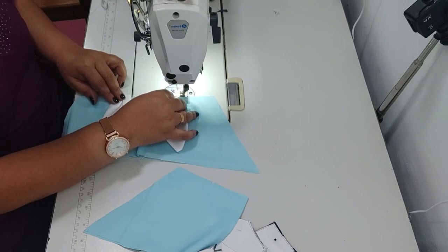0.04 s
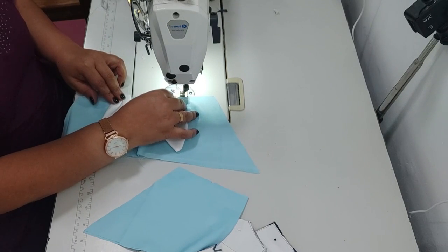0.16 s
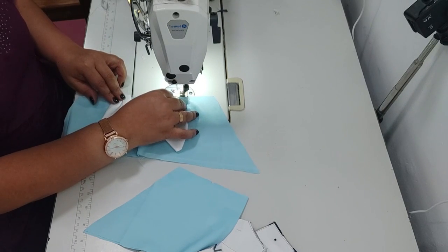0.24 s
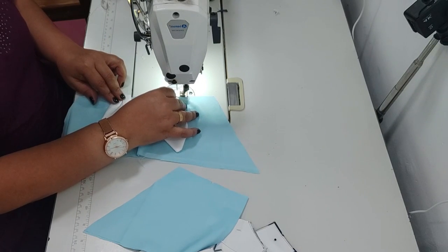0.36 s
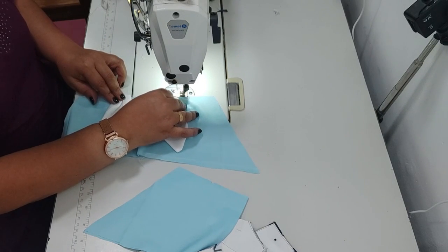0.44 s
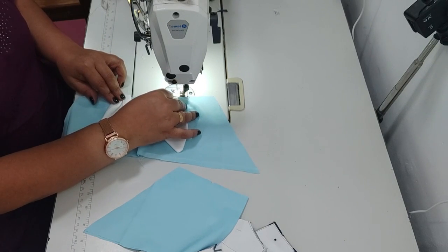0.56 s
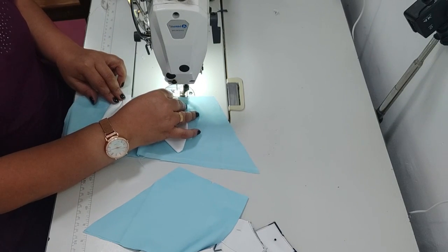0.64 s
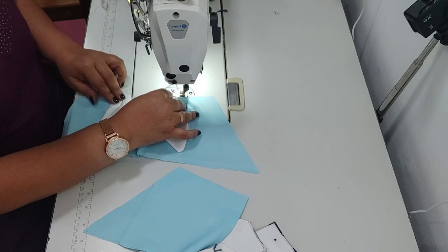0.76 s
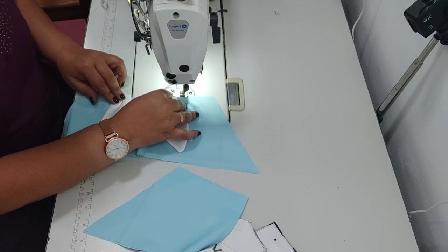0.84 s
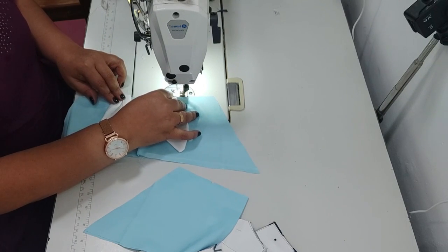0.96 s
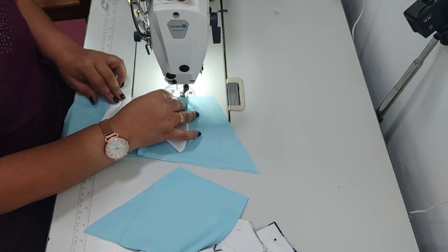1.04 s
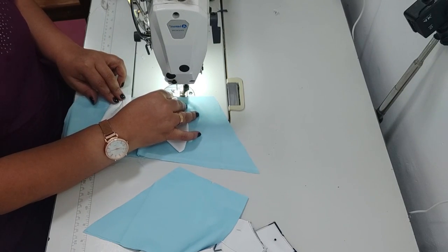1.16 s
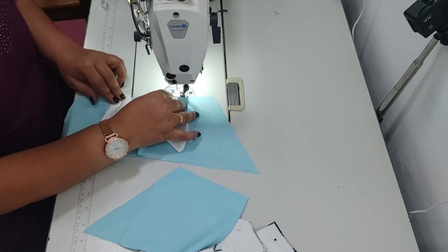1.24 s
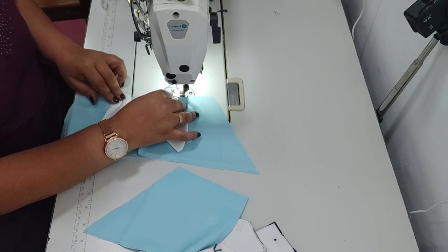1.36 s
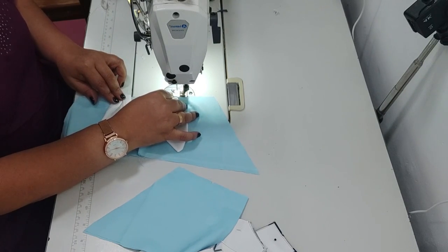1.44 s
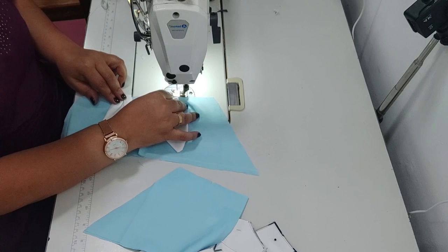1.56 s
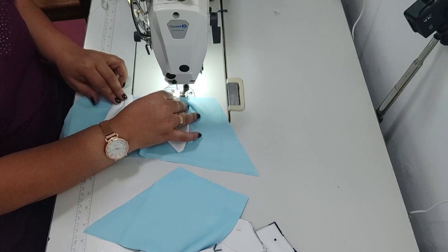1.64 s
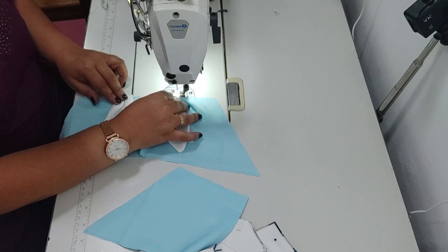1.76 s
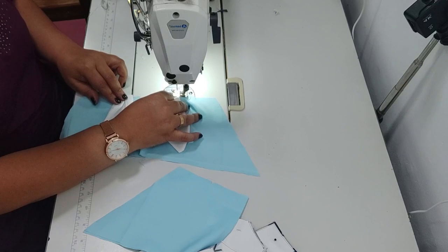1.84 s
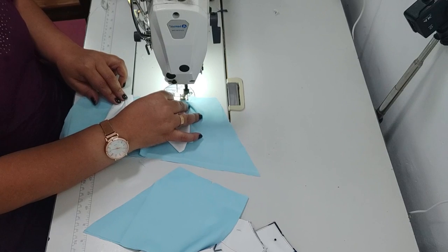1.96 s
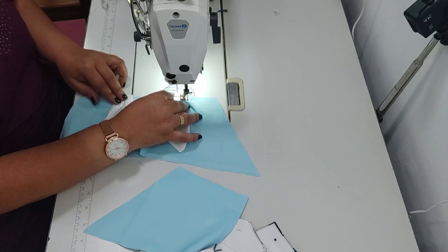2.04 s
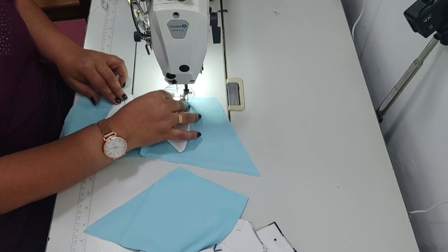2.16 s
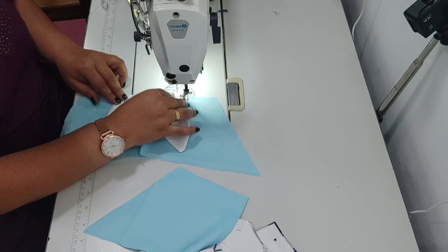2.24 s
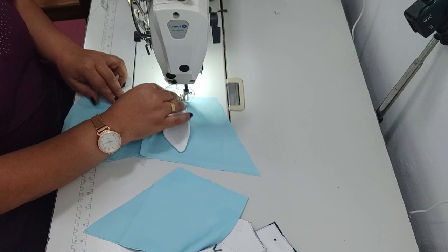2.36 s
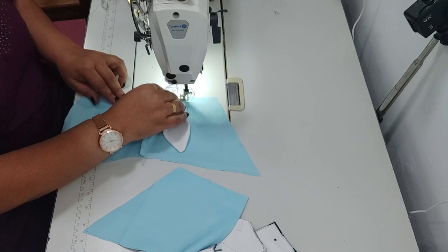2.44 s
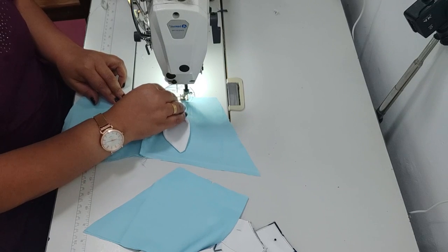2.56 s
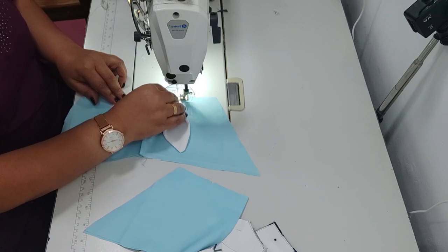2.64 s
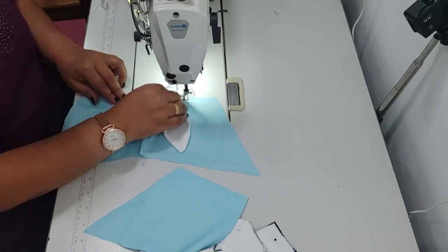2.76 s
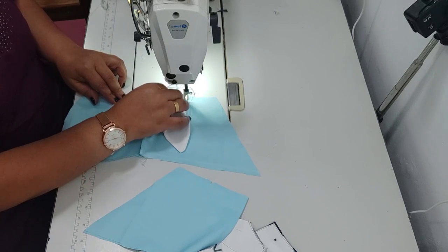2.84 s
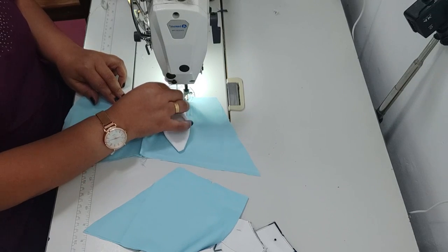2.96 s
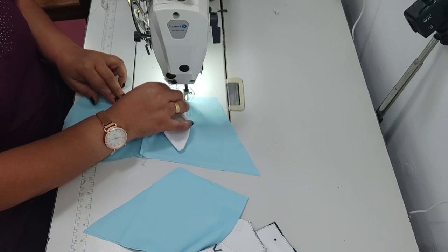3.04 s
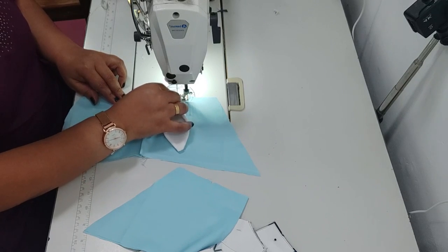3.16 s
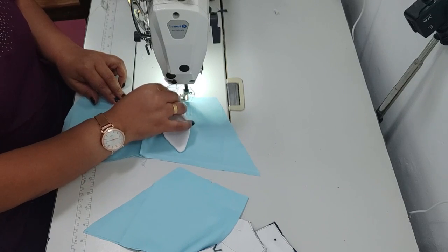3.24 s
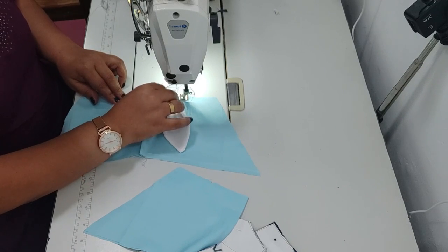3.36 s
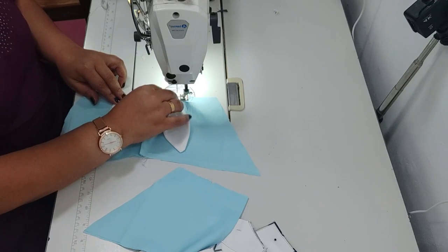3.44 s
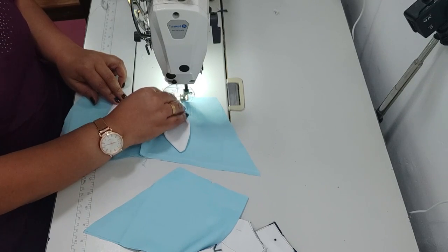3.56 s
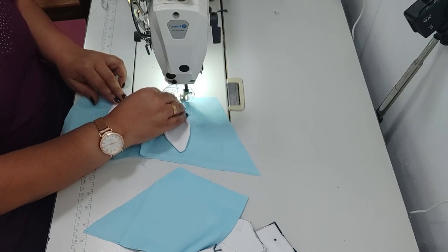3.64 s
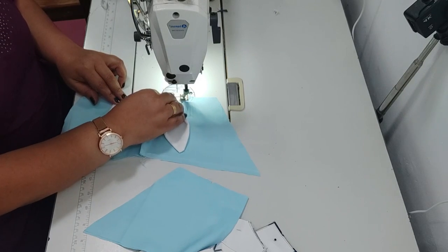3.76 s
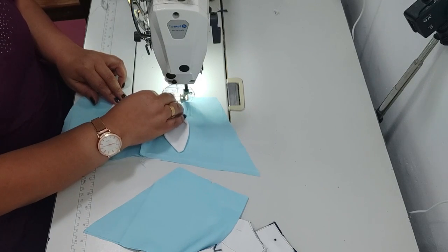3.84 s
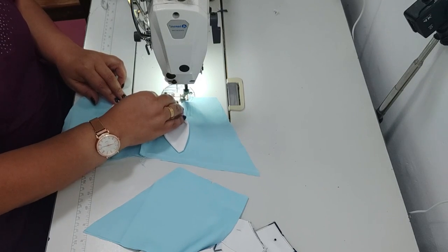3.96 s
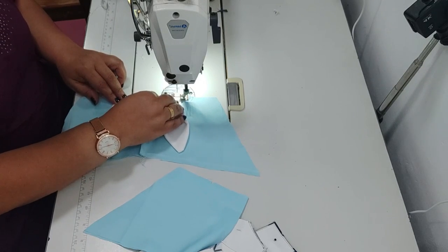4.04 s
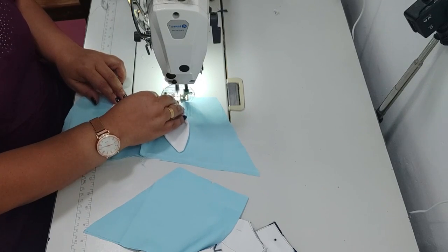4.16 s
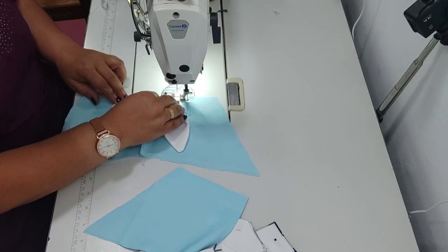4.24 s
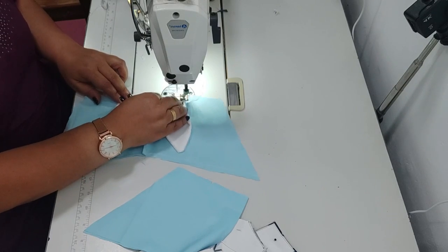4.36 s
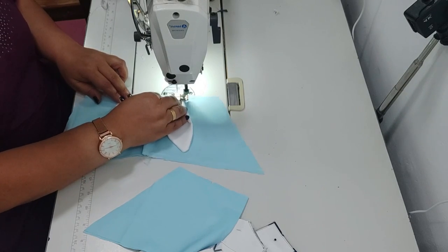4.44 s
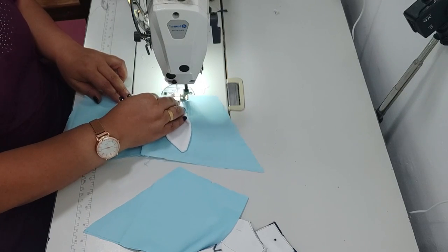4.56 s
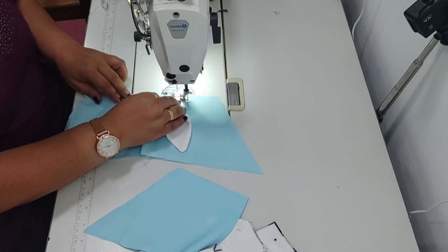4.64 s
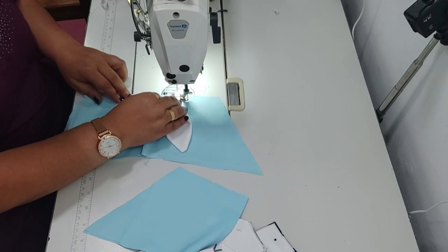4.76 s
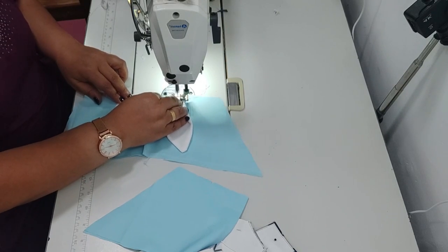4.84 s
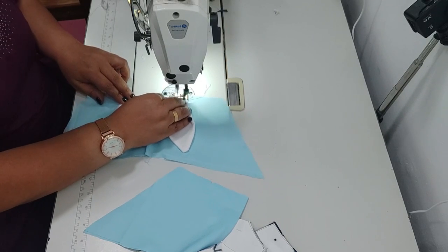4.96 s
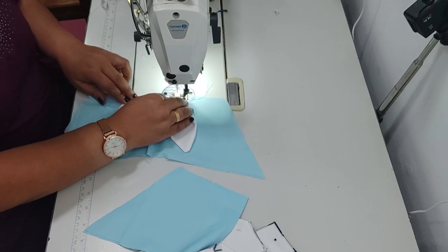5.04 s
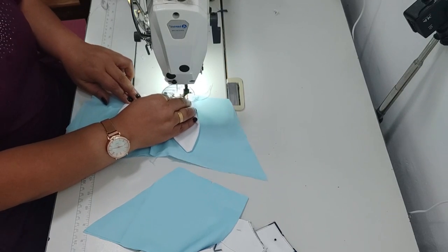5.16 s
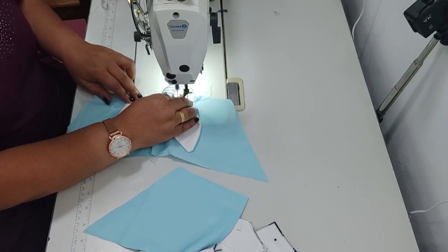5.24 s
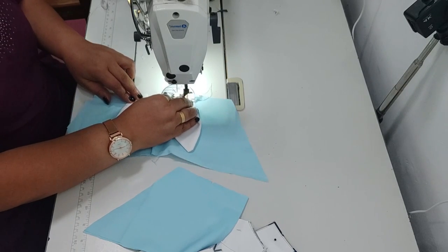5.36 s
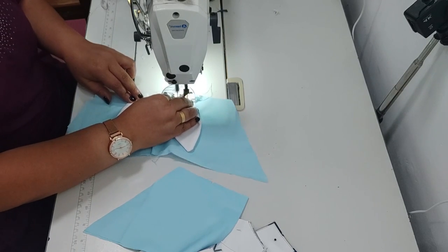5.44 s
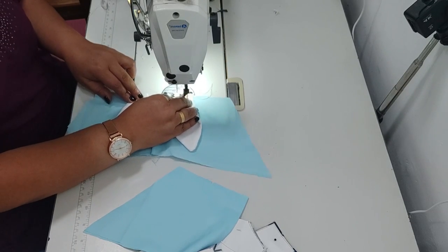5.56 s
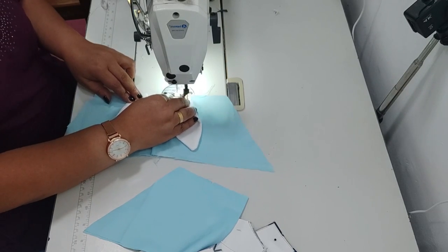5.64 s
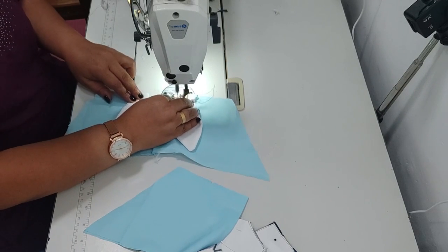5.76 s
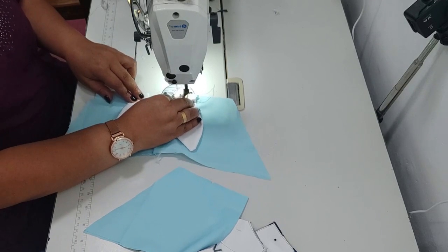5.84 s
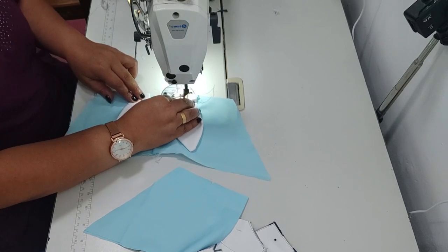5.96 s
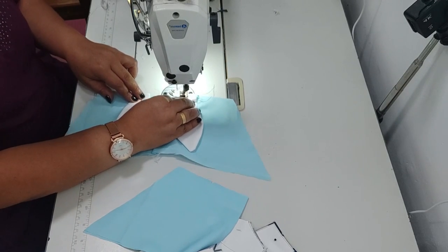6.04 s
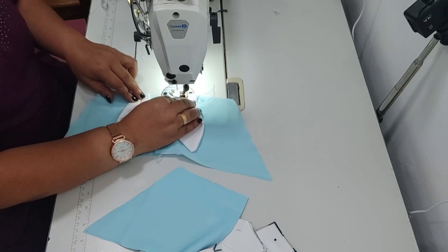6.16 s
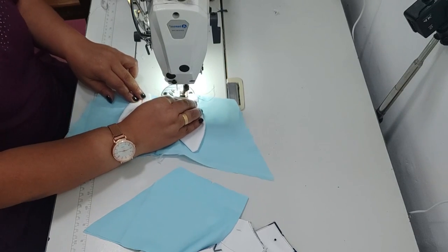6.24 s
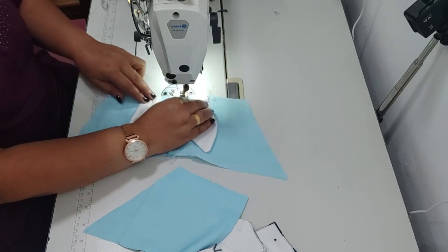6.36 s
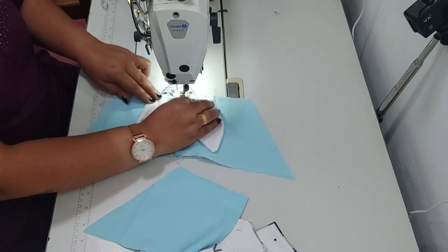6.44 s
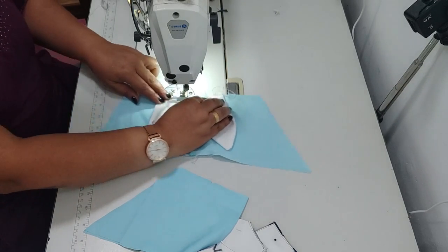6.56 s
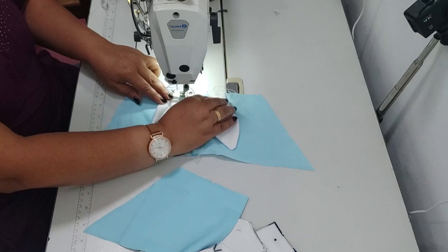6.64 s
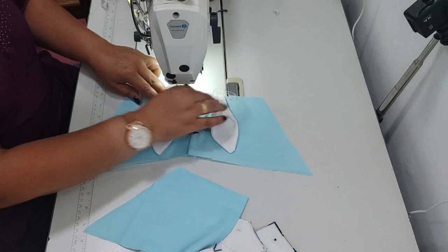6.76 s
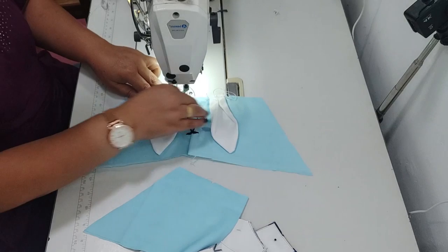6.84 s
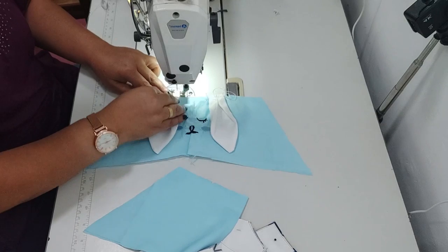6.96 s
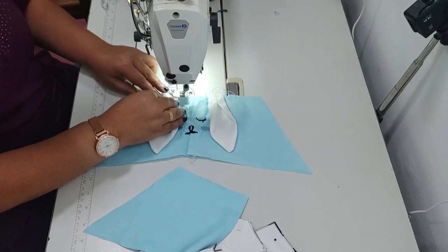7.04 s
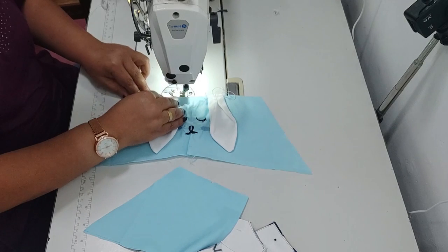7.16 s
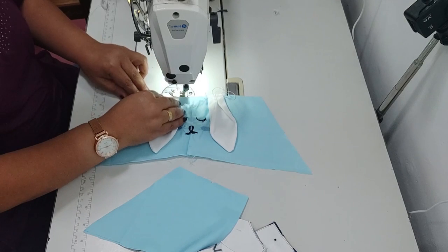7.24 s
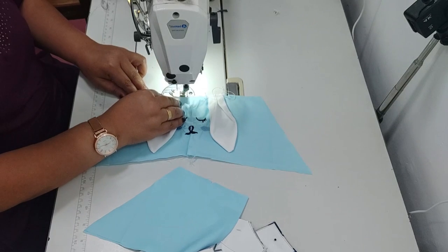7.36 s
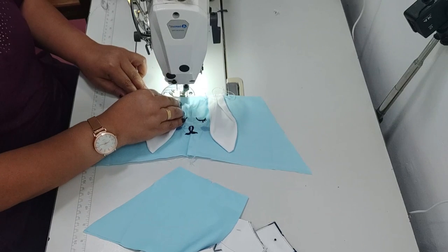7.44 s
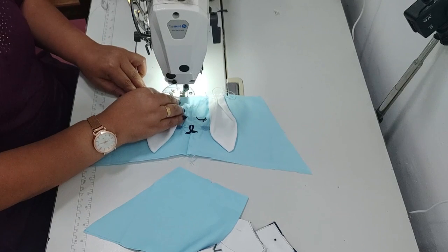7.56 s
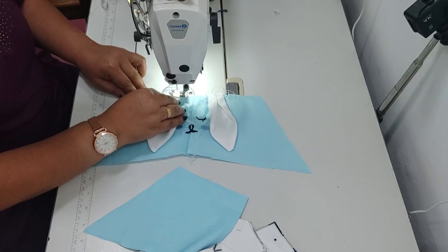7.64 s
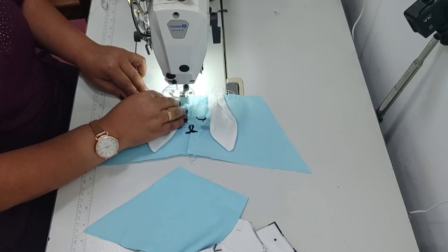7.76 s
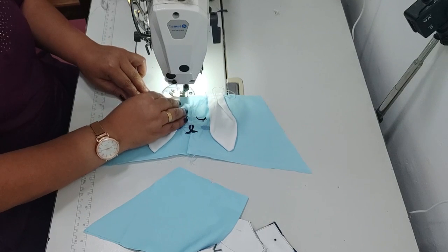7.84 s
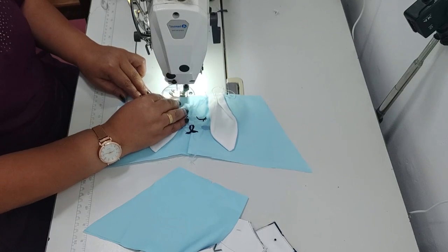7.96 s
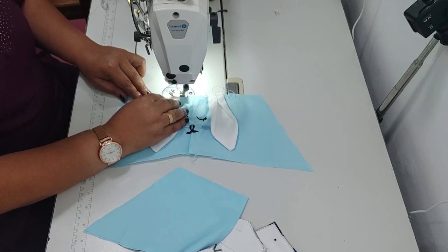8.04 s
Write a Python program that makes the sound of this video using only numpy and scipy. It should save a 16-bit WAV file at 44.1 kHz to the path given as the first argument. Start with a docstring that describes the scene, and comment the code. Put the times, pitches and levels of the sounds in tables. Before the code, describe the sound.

In a small, quiet workroom with a low hum, an industrial sewing machine is heard close up. The presser foot drops with a sharp steel clack and a woody table thump that rings on. After a pause with faint ticks, the machine chatters through a short uneven seam, with hard clicks, table thuds and brief motor whines. It ends in heavy clunks, then cloth slides off with a bright hiss.

```python
"""Industrial sewing machine

A machine on a wooden table, heard close above it in a small workroom: the presser foot drops, levers tick,
a short back-tacked seam is sewn, trimmed and stopped, then cloth slides off. Steel contacts are cracks and
shaped noise ringing small parts; blows ring modes of head and table. Filtered noise makes hum, hiss and cloth;
swept tones make the drive's whine; a decaying noise tail makes the room."""
import sys
import numpy as np
from scipy import signal
from scipy.fft import rfft, irfft, next_fast_len
from scipy.io import wavfile
from scipy.ndimage import uniform_filter1d

SR = 44100
rng = np.random.default_rng(int(sys.argv[2]) if len(sys.argv) > 2 else 0)


def to_wav(s):
    """Save 16-bit WAV."""
    ch = np.atleast_2d(s).T  # columns
    pcm = np.round(np.clip(ch, -1, 1) * 32767)  # PCM
    wavfile.write(sys.argv[1], SR, pcm.astype(np.int16))


N = 357210
T = np.arange(N) / SR
PORT_SIGN = np.array([[1], [-1]])  # left, right


def undb(db):
    """Amplitude gain of a level in dB."""
    return 10 ** (np.asarray(db) / 20)


def unit(x):
    """Scale to an RMS of 1."""
    return x / np.sqrt(np.mean(x ** 2))


def along(points, size):
    """Values of a (Hz, value) table on spectrum bins, interpolated over log frequency."""
    hz, value = np.transpose(points)
    bin_hz = np.fft.rfftfreq(size, 1 / SR)
    return np.interp(np.log(bin_hz + 1), np.log(hz), value)


def colour(x, points):
    """Filter by a (Hz, dB) table."""
    size = next_fast_len(x.shape[-1] + SR // 10)
    spectrum = rfft(x, size) * undb(along(points, size))
    return irfft(spectrum, size)[..., :x.shape[-1]]


def pair(alike, size):
    """Left and right noise whose correlation follows a (Hz, value) table."""
    likeness = np.clip(along(alike, size), -1, 1)
    mid, side = rfft(rng.standard_normal((2, size)))
    common = np.sqrt((1 + likeness) / 2) * mid
    opposed = np.sqrt((1 - likeness) / 2) * side * PORT_SIGN
    return irfft(common + opposed, size)


def band(x, lo_hz, hi_hz):
    """Keep only the spectrum bins of one band."""
    hz = np.fft.rfftfreq(x.shape[-1], 1 / SR)
    return irfft(rfft(x) * ((hz >= lo_hz) & (hz < hi_hz)), x.shape[-1])


def walk(rate_hz):
    """Random levels held 1 / rate_hz s and slewed; spread near 1."""
    hold = int(SR / rate_hz)
    steps = np.repeat(rng.standard_normal(N // hold + 1), hold)
    return 1.2 * uniform_filter1d(steps, hold)[:N]


def ring(x, hz, t60_s, turn=0.):
    """One decaying mode with a soft start, turned in phase between the ports by turn radians."""
    pole = np.exp(2j * np.pi * hz / SR - np.log(1000) / (t60_s * SR))
    push_cycles = 1.1  # onset time
    push = np.exp((2j * np.pi - 2 / push_cycles) * hz / SR)
    swing = signal.lfilter([1 - abs(push)], np.poly([pole, push]), x)
    return (swing * np.exp(.5j * turn * PORT_SIGN)).imag


RISE_S, FALL_S = 0.013, 0.019  # per 6 dB


def spell(start_s, end_s, level_db, rise_s=RISE_S, fall_s=FALL_S):
    """Gain that rises into a span, holds and falls after it, linearly in dB."""
    outside = np.maximum(np.maximum((start_s - T) / rise_s, (T - end_s) / fall_s), 0)
    return undb(level_db - 6 * outside)


# room noise spectrum, relative: hz, density_db
AIR_COLOUR = [(20, 7.5), (60, -1), (130, -10.5), (250, -10.5), (500, -20), (1000, -25), (2500, -28),
              (5000, -27.5), (8000, -30), (16000, -34.5)]
# left/right correlation of room noise: hz, likeness
AIR_ALIKE = [(60, -0.25), (130, 0.73), (290, 0.0021), (640, 0.38), (1410, -0.25), (3100, 0.096),
             (6820, 0.13), (15000, -0.91)]
# wavering hum tones: hz, width_hz, level_db
HUM_TONES = [(63, 6.1, -61.5), (96, 12, -57), (195, 61, -60.5), (285, 1.8, -95.5), (603, 27, -73.5)]
# faint distant squeals: start_s, end_s, hz, width_hz, level_db
FAINT_SQUEALS = [(.35, 1.5, 5163, 200, -71), (.45, 1.5, 11700, 700, -81), (3.1, 3.55, 5180, 200, -73),
                 (3.15, 3.55, 11700, 700, -84)]
# hiss before the foot drops: start_s, end_s, level_db (before its colour)
HISS_SPELL = (1.684, 2.05, -49)
# hiss colour, strongest near 8.7 kHz: hz, gain_db
HISS_COLOUR = [(6500, -14), (7800, -5), (8400, -6), (8750, 8.5), (9200, 3), (9800, -9)]
AIR_DB = -51.5  # RMS, 20-4000 Hz


def air():
    """Room noise in wavering octaves, narrowband hum of lamps and idle drives, squeals and hiss."""
    noise, out = colour(pair(AIR_ALIKE, N), AIR_COLOUR), 0
    for hz in 20 * 2. ** np.arange(10):
        waver_db = .7 * walk(1.5) + .8 * walk(9)
        out = out + band(noise, hz, 2 * hz) * undb(waver_db)
    out = out * undb(AIR_DB) / np.sqrt(np.mean(band(out, 20, 4000) ** 2))
    noise = pair(AIR_ALIKE, N)
    for hz, width_hz, level_db in HUM_TONES:
        out = out + undb(level_db) * unit(band(noise, hz - width_hz / 2, hz + width_hz / 2))
    for start_s, end_s, hz, width_hz, level_db in FAINT_SQUEALS:
        fade = np.clip(np.minimum(T - start_s, end_s - T) / 0.077, 0, 1)
        out = out + fade * undb(level_db) * unit(band(noise, hz - width_hz / 2, hz + width_hz / 2))
    return out + spell(*HISS_SPELL) * colour(noise, HISS_COLOUR)


# bass, middle, treble tail: t60_s, level_db against the direct sound
ROOM_BANDS = [(0.62, 1), (0.24, 2), (0.29, -2.5)]
# band edges: hz
ROOM_BAND_EDGES_HZ = (0, 560, 4300, 20000)
# left/right correlation, machine and room tail: hz, likeness
MACHINE_ALIKE = [(60, 0.82), (130, 1), (290, 0.93), (640, 0.93), (1410, -0.4), (3100, -0.6), (6820, -0.99),
                 (15000, -0.12)]


def room(x):
    """A dense noise tail, convolved with the sound, that dies sooner above the bass."""
    size, tail = SR // 2, 0
    noise = pair(MACHINE_ALIKE, size)
    for lo_hz, hi_hz, (t60_s, level_db) in zip(ROOM_BAND_EDGES_HZ, ROOM_BAND_EDGES_HZ[1:], ROOM_BANDS):
        decay = undb(-60 * T[:size] / t60_s) * np.minimum(T[:size] / .004, 1)
        tail = tail + undb(level_db) * band(noise, lo_hz, hi_hz) * decay / np.sqrt(np.sum(decay ** 2))
    return signal.fftconvolve(x, tail, axes=1)[:, :N]


# two slides of cloth and hands: time_s, hiss_db, dull_rel_db
CLOTH_SLIDES = [
    [(3.2, -66, 0), (3.49, -63, -5), (3.7, -78, -15), (3.92, -58, 2)],
    [(6.25, -59.5, 5.5), (6.47, -43, -13.5), (6.64, -38.5, -18), (6.7, -39, -13.5), (6.74, -44, -4.5),
     (6.77, -52.5, -3), (6.8, -48, -18), (6.96, -65, -13.5), (7.3, -54, -11)],
]


def cloth():
    """Bright and dull hiss envelopes; cloth catches and slips, so they are grainy."""
    bright, swish = 0, 0
    for slide in CLOTH_SLIDES:
        time_s, hiss_db, dull_rel_db = np.transpose(slide)
        hiss = undb(np.interp(T, time_s, hiss_db, left=-150, right=-150))
        hiss = hiss * undb(.8 * walk(25) + 1.2 * walk(150))
        bright = bright + hiss
        swish = swish + hiss * undb(np.interp(T, time_s, dull_rel_db))
    return bright, swish


# loose bars that sing on: start_s, level_db, hz, t60_s
BAR_RINGS = [(2.076, -44, 720, .75), (6.14, -41, 724, .85), (6.4, -49, 605, .45), (3.176, -59, 1060, .35)]


def loose_bars():
    """Impulses ring long single modes of wavering level."""
    out = 0
    for start_s, level_db, hz, t60_s in BAR_RINGS:
        impulse = (np.arange(N) == int(start_s * SR)) * undb(level_db)
        out = out + ring(impulse, hz, t60_s) * undb(2.5 * walk(40))
    return out


def strain(hz):
    """An unsteady tone with its octave."""
    wobble, octave_db = .008, -19
    phase = 2 * np.pi * np.cumsum(hz * (1 + wobble * walk(90))) / SR
    return np.sin(phase) + undb(octave_db) * np.sin(2 * phase)


# whines: start_s, end_s, start_hz, end_hz, level_db
DRIVE_WHINES = [(5.358, 5.4, 978, 1014, -39), (5.408, 5.445, 1050, 1085, -34.5),
                (5.46, 5.48, 1040, 1050, -38), (5.534, 5.597, 1041, 1020, -33),
                (5.603, 5.64, 1011, 961, -33)]


def whine():
    """Strained gliding tones as the drive brakes and restarts."""
    out, edge_s = 0, .005
    for start_s, end_s, start_hz, end_hz, level_db in DRIVE_WHINES:
        gain = spell(start_s, end_s, level_db + 2.5 * walk(60), edge_s, edge_s)
        out = out + gain * strain(np.interp(T, [start_s, end_s], [start_hz, end_hz]))
    return np.sqrt(2) * out


# spells of motion, relative drives: start_s, end_s, clatter_db, drone_db, buzz_db, shake_db
MOTION = [(2.077, 2.078, -30, -58, -44, -80), (3.985, 4.122, -57.5, -45.5, -48.5, -49.5),
          (4.273, 4.355, -68, -29, -46, -57.5), (4.371, 4.462, -17.5, -25.5, -33, -36),
          (4.49, 4.59, -20, -19.5, -33, -34), (4.653, 4.7, -25, -31.5, -41, -60),
          (4.735, 4.845, -32, -28, -44, -48), (4.906, 4.956, -25, -29.5, -41, -62),
          (4.999, 5.312, -18.5, -27, -38.5, -50), (5.367, 5.416, -21.5, -14, -36, -46.5),
          (5.468, 5.52, -38, -35.5, -49.5, -60.5), (5.577, 5.757, -19.5, -20, -34, -43.5),
          (5.838, 5.884, -18, -28.5, -34.5, -34), (5.909, 5.955, -32, -32.5, -28.5, -58),
          (5.995, 6.018, -31, -40.5, -32, -58), (6.129, 6.171, -37, -20.5, -29, -65)]
STITCH_HZ = 30.8


def running():
    """Gains of clatter, table drone, head buzz and shake, summed over all spells."""
    return sum(spell(start_s, end_s, np.array(levels_db)[:, None]) for start_s, end_s, *levels_db in MOTION)


def shake():
    """The running machine sways its table once a stitch, at an unsteady rate."""
    gain = running()[3]
    cycles = STITCH_HZ * np.cumsum(1 + 0.06 * walk(9)) / SR
    return np.sqrt(2) * gain * np.sin(2 * np.pi * cycles)


# even, slow stretch of seam
SEAM_S, SEAM_STITCH_S, SEAM_FADE_DB = 5.074, .0596, -4  # first blow, stitch length, change per stitch


def seam(late_s, row, per_stitch, count):
    """Evenly spaced event rows, weaker stitch by stitch."""
    rows = []
    for k in range(count):
        stitches = k / per_stitch
        rows.append((SEAM_S + late_s + stitches * SEAM_STITCH_S, row[0] + SEAM_FADE_DB * stitches, *row[1:]))
    return rows


# blows: start_s, low_db (230-420 Hz), mid_rel_db (750 Hz), high_rel_db (1800 Hz), low_mode_hz, mid_mode_hz
TABLE_BLOWS = [(1.974, -47, -2, -23, 360, 450), (2.076, -10, -9.5, -16, 275, 504),
               (2.095, -12.5, -17, -22, 275, 600), (2.122, -19, -15, -16, 280, 630),
               (2.17, -24, -14, -25, 310, 446), (2.194, -25, -10, -25, 330, 500),
               (2.217, -31, -7, -25, 250, 450), (2.25, -32.5, -8, -25, 330, 450),
               (3.177, -63, 16.5, -7, 237, 1050), (3.847, -67, 12, -2, 377, 1090),
               (3.941, -63.5, 20, -7, 266, 1080), (3.992, -70, 13, 13, 277, 840),
               (4.044, -43, 2, -20, 330, 465), (4.061, -30, -11, -27, 260, 465),
               (4.074, -24.5, -6.5, -18.5, 320, 504), (4.098, -30, -1, -20, 277, 504),
               (4.28, -23, -19, -29, 277, 991), (4.373, -16, -16, -29, 282, 990),
               (4.387, -19, -20, -25, 284, 990), (4.401, -18.5, -23, -24, 278, 996),
               (4.42, -22, -22, -25, 283, 700), (4.439, -21, -17, -27, 277, 590),
               (4.454, -19, -11, -25, 285, 590), (4.479, -11, -14, -32, 316, 646),
               (4.501, -14.5, -5.5, -27, 303, 603), (4.524, -17.5, -14, -34, 302, 603),
               (4.557, -17, -21, -31, 294, 526), (4.572, -18, -18, -30, 292, 560),
               (4.587, -13.5, -11.5, -32, 296, 567), (4.614, -20.5, -12, -13, 297, 507),
               (4.8, -18.5, -32, -36, 261, 526), (4.933, -25, -18, -45, 278, 576),
               (5.014, -21, -32, -29, 276, 859), (5.348, -17.5, 1.5, -8.5, 380, 480),
               (5.364, -22, 5, -12, 345, 480), (5.379, -19, 2.5, -30, 277, 510),
               (5.4, -19, -6.5, -26, 270, 850), (5.418, -17.5, 1.5, -34, 276, 1170),
               (5.457, -26, -18, -36, 263, 1070), (5.603, -9, -11, -16, 344, 458),
               (5.629, -19.5, -2, -30.5, 331, 684), (5.669, -21.5, -14.5, -39.5, 284, 589),
               (5.722, -15.5, -11, -18.5, 278, 483), (5.759, -33, 0.5, 1.5, 290, 634),
               (5.841, -28.5, -2, -28.5, 270, 615), (5.91, -13.5, -1, -15, 330, 860),
               (5.918, -22, 2.5, -20.5, 320, 600), (5.927, -17.5, 2, -21, 300, 875),
               (5.939, -22, 1, -30.5, 281, 600), (5.984, -5.5, -24, -17.5, 285, 457),
               (6.002, -8, -11.5, 2, 260, 620), (6.024, -12, -11.5, -10.5, 290, 600),
               (6.117, -20.5, -34, -22, 281, 681), (6.14, -19.5, -2, -6, 285, 695),
               (6.155, -18.5, -1, -17.5, 345, 703), (6.172, -19.5, -6, -18, 400, 615),
               (6.43, -53, 6, -6, 300, 1000)]
# seam blow: low_db, mid_rel_db, high_rel_db, low_mode_hz, mid_mode_hz
STITCH_BLOW = (-12, -24, -45, 279, 924)
# head and table modes: hz, rel_db, t60_s
BODY_MODES = [(58, -14, .25), (88, -3, .25), (105, -4, .25), (156, -2, .24), (186, -1, .22), (210, -2, .16),
              (250, -3, .18), (277, 2, .25), (298, 0, .18), (322, -3, .16), (345, -2, .14), (400, -5, .12),
              (445, -3, .12), (492, -2, .1), (550, -4, .08), (598, 0, .13), (684, 0, .1), (780, -3, .09),
              (851, 0, .1), (924, 0, .1), (996, -4, .09), (1080, -1, .09), (1217, -2, .06), (1350, -4, .05),
              (1480, -3, .05), (1600, 2, .05), (1746, 1, .045), (1846, 1, .045), (2005, 0, .05),
              (2234, -1, .05), (2347, -1, .05), (2552, -2, .05)]
# braked drive holds the table: start_s, end_s, share of ring time left to blows below 420 Hz
HELD_SPELLS = [(5.97, 6.05, 0.46)]
# 230-420 Hz ring breaks off, mostly just before hard ticks: time_s
RING_STOPS_S = [2.152, 4.469, 4.607, 5.101, 5.149, 5.214, 5.741]
STOP_S, STOP_LEFT = .002, .3  # time constant, share of swing left
THUD_DB, THUD_SLOPE = -32.5, .45  # below 230 Hz for a -15 dB blow, dB per dB of blow
HIGH_MODE_HZ = 1810
FAR_DB, FAR_REACH = (17, 12, 12), (.13, .28, .45)  # low, mid, high: greatest loss, reach in ln(Hz)


def blow_ring(x, hz, t60_s, turn, part):
    """Ring of all blows in one mode, damped while held and broken off at stops."""
    out = 0
    if part < 2:
        for start_s, end_s, share in HELD_SPELLS:
            held = x * (T > start_s) * (T < end_s)
            out = out + ring(held, hz, t60_s * share, 0.67 * turn)
            x = x - held
    if part == 1:
        for start_s, stop_s in zip([0] + RING_STOPS_S, RING_STOPS_S):
            early = x * (T > start_s) * (T <= stop_s)
            left = STOP_LEFT + (1 - STOP_LEFT) * np.exp(-np.maximum(T - stop_s, 0) / STOP_S)
            out = out + ring(early, hz, t60_s, turn) * left
            x = x - early
    return out + ring(x, hz, t60_s, turn)


def body():
    """Blows and running noise excite one set of modes; mode levels vary from blow to blow."""
    blows = np.transpose(TABLE_BLOWS + seam(0, STITCH_BLOW, per_stitch=1, count=4))
    start_s, low_db, mid_rel_db, high_rel_db, *favoured_hz = blows
    favoured_hz = favoured_hz + [HIGH_MODE_HZ]
    spot = rng.standard_normal((len(start_s), len(BODY_MODES)))
    _, drone, buzz, _ = running()
    thud_db = THUD_DB + THUD_SLOPE * (low_db + 15)
    part_db = [thud_db, low_db, low_db + mid_rel_db, low_db + high_rel_db]
    out = 0
    for k, (hz, mode_db, t60_s) in enumerate(BODY_MODES):
        part = np.searchsorted([230, 420, 1150], hz)  # thud, low, mid, high
        blow_db = part_db[part]
        if part:
            distance = np.abs(np.log(hz / favoured_hz[part - 1])) / FAR_REACH[part - 1]
            blow_db = blow_db - FAR_DB[part - 1] * np.minimum(distance, 1)
        # low modes share one sign per blow, so the thump starts at once
        sign = np.sign(spot[:, 0 if part == 1 else k - 1])
        x = np.zeros(N)
        x[(start_s * SR).astype(int)] = undb(blow_db + mode_db + 2.0 * spot[:, k]) * sign
        likeness = np.interp(hz, *np.transpose(MACHINE_ALIKE))
        turn = (-1) ** k * np.arccos(np.clip(likeness, -1, 1))
        steady = unit(ring(rng.standard_normal(N), hz, t60_s * 1.3, turn))
        steady = steady * (drone if hz < 420 else buzz)
        out = out + blow_ring(x, hz, t60_s, turn, part) + undb(mode_db - 15.0) * steady
    return out


# levers and plates: hz, peak_rel_db, t60_s (for contacts)
LEVER_PARTS = [(1560, 0, .02), (1740, 5, .02), (1960, 11, .025), (2270, 8, .015), (2440, 5, .015),
               (2620, 11, .022), (2790, 5, .015), (3010, 0, .015)]
# needle bar and hook against levers and plates: start_s, peak_db, favoured_hz
NEEDLE_KNOCKS = [(3.9428, -59, 2600), (3.9972, -37, 2280), (4.075, -44, 1830), (4.257, -34, 1930),
                 (4.3015, -30, 2640), (4.338, -28, 1770), (4.3574, -20, 2220), (4.4769, -7, 2630),
                 (4.6128, -13.5, 2600), (4.8438, -37, 2520), (4.868, -26, 2530), (4.8897, -34, 1990),
                 (4.9156, -33, 2000), (4.9845, -31, 2640), (5.0498, -23, 1950), (5.0686, -31, 2430),
                 (5.1681, -22, 1950), (5.1857, -24, 2280), (5.2479, -29, 2600), (5.3132, -24, 1940),
                 (5.3464, -24, 1560), (5.3656, -23, 2220), (5.5144, -35, 1910), (5.5367, -34, 2240),
                 (5.5587, -34, 2510), (5.5726, -23, 2470), (5.6015, -18, 2594), (5.7009, -24.5, 1977),
                 (5.7467, -16, 1750), (5.9019, -17.5, 1547), (5.9802, -14, 2540), (6.0019, -7.5, 1884),
                 (6.1134, -16, 2570), (6.1353, -24, 1770)]
KNOCK_TRIM_DB, KNOCK_REACH, KNOCK_T60_S = -3.5, 0.15, 0.027  # reach in ln(Hz)


def knocks():
    """Each knock rings mostly the parts near its favoured pitch."""
    start_s, peak_db, favoured_hz = np.transpose(NEEDLE_KNOCKS)
    spot, out = rng.standard_normal((len(start_s), len(LEVER_PARTS), 2)), 0
    for k, (hz, _, _) in enumerate(LEVER_PARTS):
        far = np.minimum(np.abs(np.log(hz / favoured_hz)) / KNOCK_REACH, 1)
        level_db = peak_db + KNOCK_TRIM_DB - 26 * far + 2 * spot[:, k, 0]
        x = np.zeros(N)
        x[(start_s * SR).astype(int)] = undb(level_db) * np.sign(spot[:, k, 1])
        out = out + ring(x, hz, KNOCK_T60_S, 0.93 * (-1) ** k)
    return out


def clatter():
    """Bright and dull envelopes of random small knocks, slightly stronger once a stitch."""
    bright_gain, _, buzz, _ = running()
    hits = (rng.random(N) < 300 / SR) * undb(2.7 * rng.exponential(size=N))  # 300 per s
    hits = hits * (1 + 0.1 * np.cos(2 * np.pi * STITCH_HZ * T))
    decays = signal.lfilter([1], [1, -np.exp(-1 / (.002 * SR))], hits)
    grain = unit(.12 + unit(decays))
    return bright_gain * grain, 0.44 * buzz * grain ** 1.29 * undb(3.46 * walk(90))


# steel on steel: start_s, peak_db (5-10 kHz), dull_rel_db (1.5-4 kHz), rattle_rel_db
STEEL_TICKS = [(2.053, -35, 3, -6.5), (2.059, -28, -16, -4), (2.0648, -4.5, -34, -20),
               (2.0725, -13.5, -7.5, -7), (2.0763, 0.5, -18.5, -12), (2.094, -15, -9, -9),
               (2.117, -5.5, -34, -6), (2.148, -27, -17, 1), (2.182, -26, -15, 1), (2.213, -29, -18, 3),
               (2.25, -40, -5, -5.5), (3.174, -28.5, -15.5, -10.5), (3.846, -39, -16, 0.5),
               (3.9412, -16, -37, -2), (3.996, -37, -10, -4), (4.075, -21, -32.5, 2),
               (4.254, -8, -26, -5.5), (4.2997, -12, -16.5, -6), (4.341, -6, -29, -7), (4.351, -6, -20, -8),
               (4.374, -15, -30, 5.5), (4.401, -12.5, -13.5, -4), (4.432, -9, -18, -3),
               (4.4671, -6.5, -8, -22), (4.476, 5.5, -16.5, -16.5), (4.492, -16.5, -15, -15),
               (4.5015, -11, -22, -23), (4.514, -10, -16, -20), (4.563, -7.5, -20, -2.5),
               (4.578, -14, -20, -5), (4.588, -9.5, -18, -11), (4.602, -10, -21.5, -6),
               (4.6126, -4.5, -10, -8.5), (4.783, -17, -18, 0.5), (4.798, -24, -11.5, -16),
               (4.877, -29, -26, 1), (4.887, -13.5, -22, -6.5), (4.9127, -11, -38, -2.5),
               (4.984, -8.5, -31, 1), (5.0492, -8.5, -18.5, -5.5), (5.058, -17, -30, -25),
               (5.069, -15, -23, -15), (5.143, -12, -33, -20), (5.178, -12, -19, -2),
               (5.201, -17, -12.5, -7), (5.238, -20, -19, -12), (5.289, -6.5, -50, -7), (5.324, -7, -28, 1),
               (5.333, -13, -17.5, -6), (5.364, -3.5, -22, -2), (5.4725, -27, -28, -10.5),
               (5.513, -20, -31, -9), (5.5359, -1.5, -37, -6.5), (5.5588, -14.5, -20, -1),
               (5.584, -12, -19, -4.5), (5.6007, 0, -11, -12.5), (5.674, -11, -24, -9),
               (5.691, -9, -22, -7), (5.7065, -6, -29.5, -4), (5.723, -7, -21, -0.5),
               (5.7461, -0.5, -13, -12.5), (5.8207, -14, -21, -12.5), (5.832, -18, -21, -11),
               (5.843, -12.5, -19.5, 0), (5.869, -2.5, -30, -3.5), (5.905, 2, -15.5, -6.5),
               (5.978, -7, -6.5, -8.5), (6.001, -16.5, -4, -8), (6.113, 1.5, -14.5, -5),
               (6.136, -4, -23, -13), (6.1564, -39, -24, -27), (7.1, -46, -27, 3)]
# seam tick: peak_db, dull_rel_db, rattle_rel_db
STITCH_TICK = (-18.5, -22, -1)
SEAM_TICK_LATE_S = .0315  # after the first seam blow
CRACK, PING_S = 0.8, 0.0011  # crack size, time to the burst's peak
RATTLE_T60_S, RATTLE_SHRINK = 0.076, 0.14  # at a -9 dB tick, dB off the time per dB of tick
PAN_DB, PAN_SPREAD_DB = 1.5, 7  # left minus right


def ticks():
    """Cracks and bright and dull rattle envelopes; harder ticks seat loose parts sooner."""
    # axes: bright/dull, left/right, sample
    cracks, rattles, t = np.zeros((2, 2, N)), np.zeros((2, 2, N + SR)), T[:SR // 4]
    events = STEEL_TICKS + seam(SEAM_TICK_LATE_S, STITCH_TICK, per_stitch=2, count=5)
    for start_s, peak_db, dull_rel_db, rattle_rel_db in events:
        pan_db = PAN_DB + PAN_SPREAD_DB * rng.standard_normal()
        size = undb(peak_db + np.array([[0], [dull_rel_db]]) + np.array([pan_db, -pan_db]) / 2)
        i = int(start_s * SR)
        cracks[:, :, i + int(.0005 * SR)] = CRACK * size * rng.choice([-1, 1])
        burst = 0.57 * t / PING_S * np.exp(1 - t / PING_S)
        t60_s = RATTLE_T60_S * undb(-RATTLE_SHRINK * (peak_db + 9.0))
        tail = undb(rattle_rel_db) * (1 - np.exp(-t / 0.0049)) * undb(-60 * t / t60_s)
        rattles[:, :, i:i + len(t)] += size[:, :, None] * (burst + tail)
    bright = rattles[0, :, :N] * undb(2.6 * walk(250))
    dull = rattles[1, :, :N] * undb(3 * walk(200))
    return cracks, bright, dull


# bright contact colour: hz, gain_db
STEEL_BRIGHT = [(4000, -18), (5000, -16.5), (8000, -7.5), (11000, -9.5), (16000, -16)]
# dull contact colour: hz, gain_db
STEEL_DULL = [(500, 4), (1000, 4.5), (1400, -4.5), (2300, 3), (3100, -2), (4500, 5.5), (6000, 1)]
# dull cloth colour: hz, gain_db
SWISH_COLOUR = [(600, 2.5), (1500, -2), (2200, 5.5), (2900, 0.5), (3600, -0.5), (5000, -1), (7000, -9)]
STEEL_ALIKE, LEFT_LAG_S = .4, 2.5e-5  # port correlation, delay of the left port


def contact():
    """Ticks, clatter and cloth as coloured cracks and noise; dull steel rings levers and plates."""
    cracks, tick_bright, tick_dull = ticks()
    clatter_bright, clatter_dull = clatter()
    cloth_bright, swish = cloth()
    bright = tick_bright + clatter_bright + cloth_bright
    dull = tick_dull + clatter_dull
    alike = [(1, STEEL_ALIKE)]
    out = colour(cracks[0], STEEL_BRIGHT) + colour(cracks[1], STEEL_DULL)
    for envelope, shape in ((bright, STEEL_BRIGHT), (dull, STEEL_DULL), (swish, SWISH_COLOUR)):
        out = out + envelope * colour(pair(alike, N), shape)
    stir = cracks[1] + dull * pair(alike, N)
    for hz, peak_rel_db, t60_s in LEVER_PARTS:
        # the rings flutter randomly in level
        fluttering = stir * undb(1.9 * walk(60))
        out = out + ring(fluttering, hz, t60_s) * undb(peak_rel_db) * 2 * np.log(1000) / (t60_s * SR)
    lag = np.exp(-2j * np.pi * np.fft.rfftfreq(N, 1 / SR) * LEFT_LAG_S * np.array([[1], [0]]))
    return irfft(rfft(out) * lag, N)


# brief level dips before the hardest ticks: start_s, end_s
LEVEL_DIPS = [(4.4705, 4.4755), (4.606, 4.611), (5.595, 5.6), (5.741, 5.745), (5.972, 5.9775)]
# stereo balance: hz, left_minus_right_db
STEREO_LEAN = [(60, 6), (110, 3), (200, 6.5), (380, 8), (700, 4), (1290, 2.5), (2380, 2), (4400, 0),
               (6500, -6.5), (8120, 2), (15000, 1.5)]
DIP_DB = -6.5
BODY_FAR_DB = -13  # head and table sound mostly in the near field and stir the room less


def scene():
    """Machine, room answer and room noise, with level dips and stereo balance."""
    steel = contact() + knocks()
    table = body() + loose_bars() + whine() + shake()
    both = steel + table + room(steel + undb(BODY_FAR_DB) * table) + air()
    dip = sum((T > start_s) * (T < end_s) * 1. for start_s, end_s in LEVEL_DIPS)
    both = both * undb(DIP_DB * uniform_filter1d(dip, size=60))
    hz, lean_db = np.transpose(STEREO_LEAN)
    left = colour(both[0], np.transpose([hz, lean_db / 2]))
    right = colour(both[1], np.transpose([hz, -lean_db / 2]))
    return np.array([left, right])


# microphone port response, resonant near 8 kHz: hz, gain_db
PORT_RESPONSE = [(20, -3), (4500, -0.5), (6300, 1.5), (7200, 9.5), (8200, 11), (9000, 7), (9800, -9.5),
                 (11000, -17), (13000, -12), (16000, -21.5)]
TOP_HZ = 15800


def record(dry):
    """The port resonates, peaks clip softly and a steep low-pass cuts the top."""
    wet = np.tanh(colour(dry, PORT_RESPONSE))
    low_pass = signal.ellip(8, .2, 70, TOP_HZ, fs=SR, output="sos")
    return signal.sosfilt(low_pass, wet)


dry = scene()
out = record(dry)
to_wav(out)
```